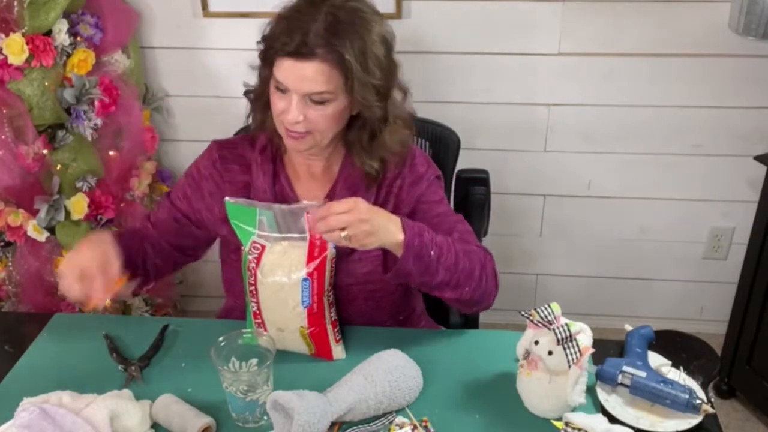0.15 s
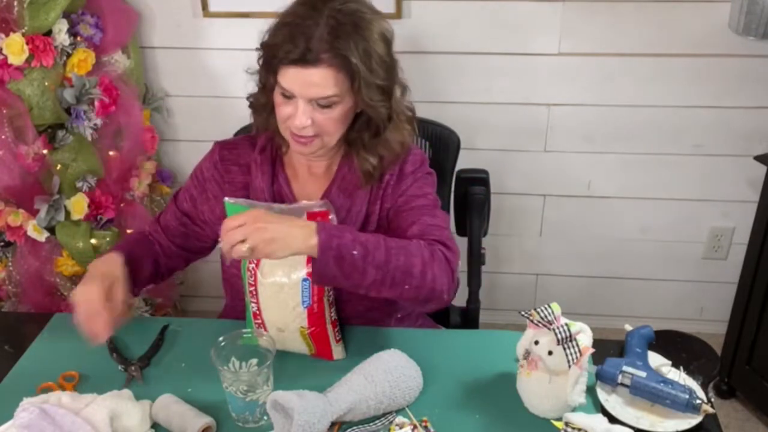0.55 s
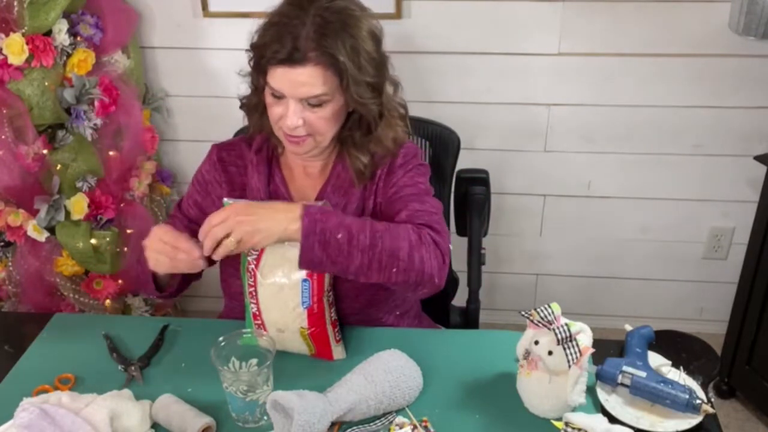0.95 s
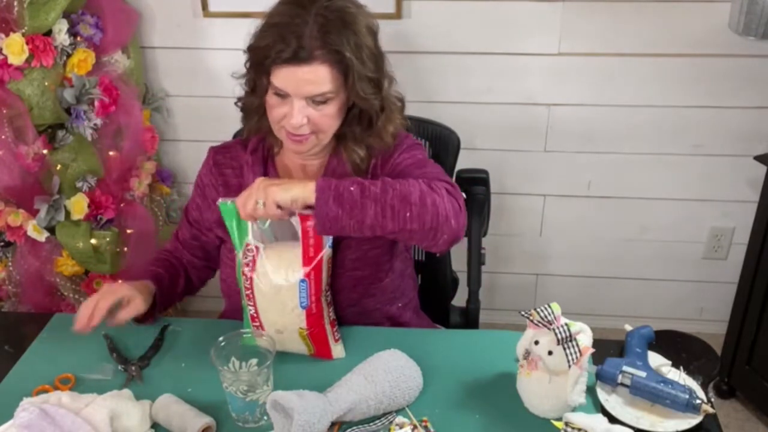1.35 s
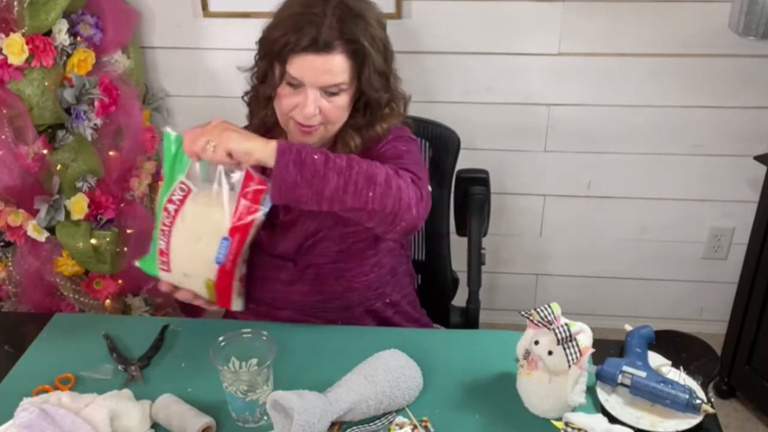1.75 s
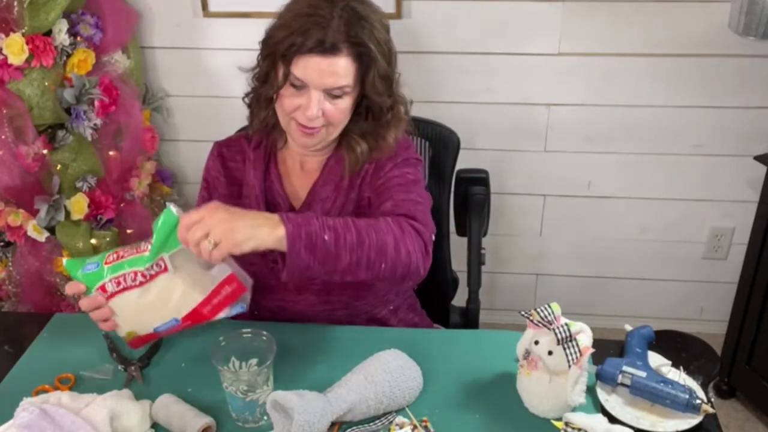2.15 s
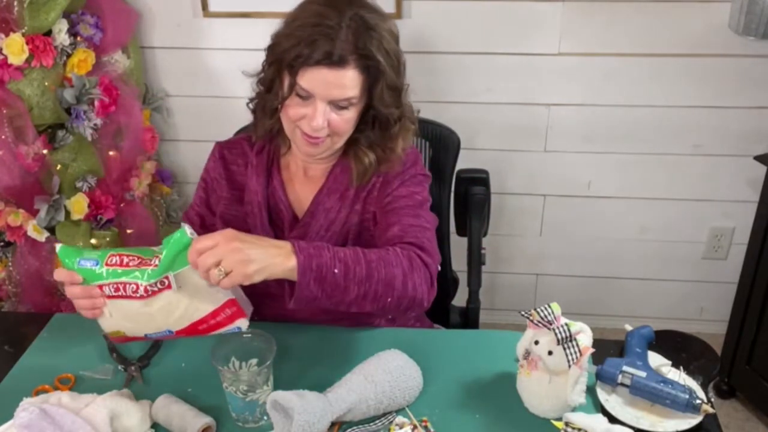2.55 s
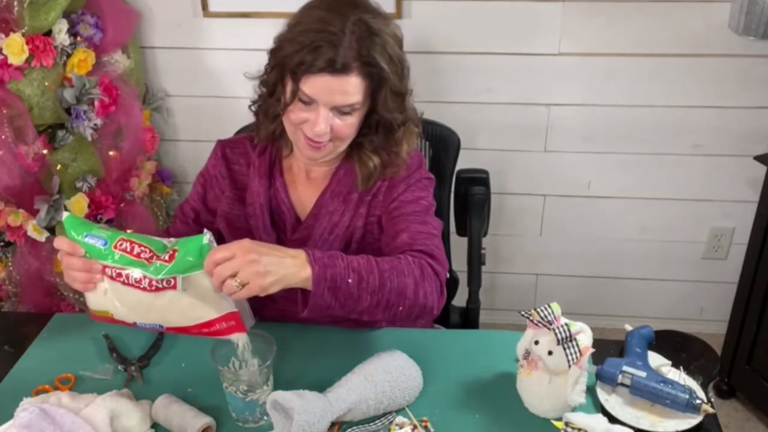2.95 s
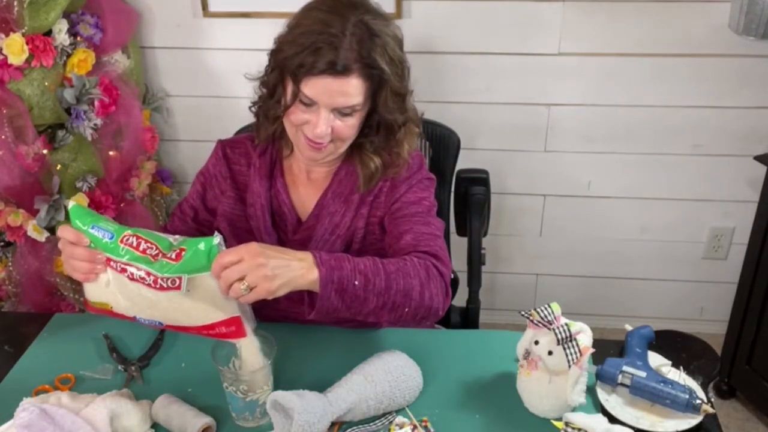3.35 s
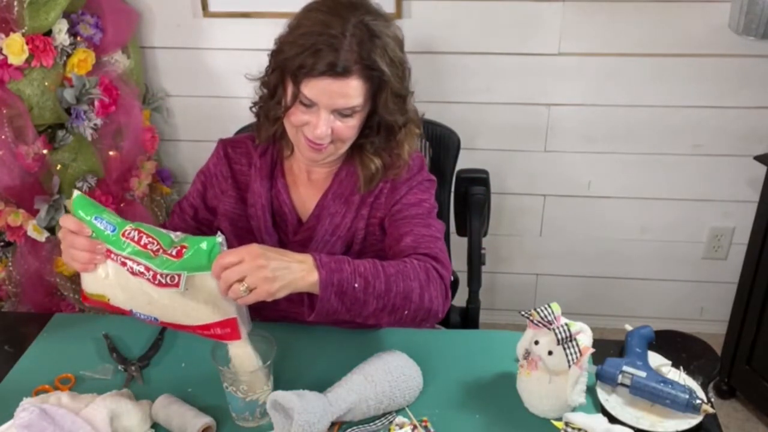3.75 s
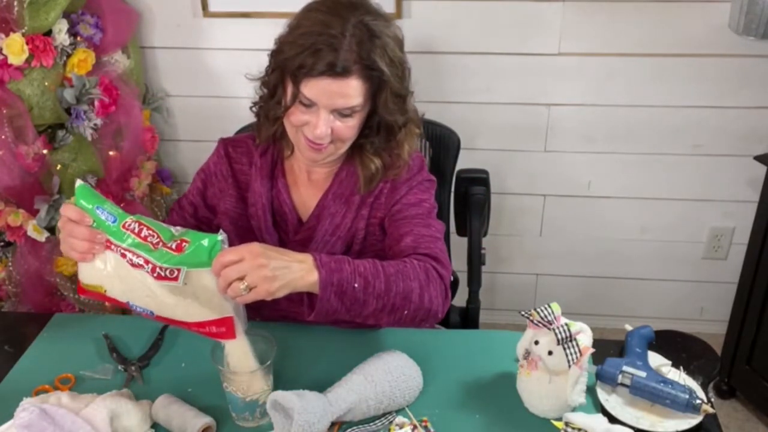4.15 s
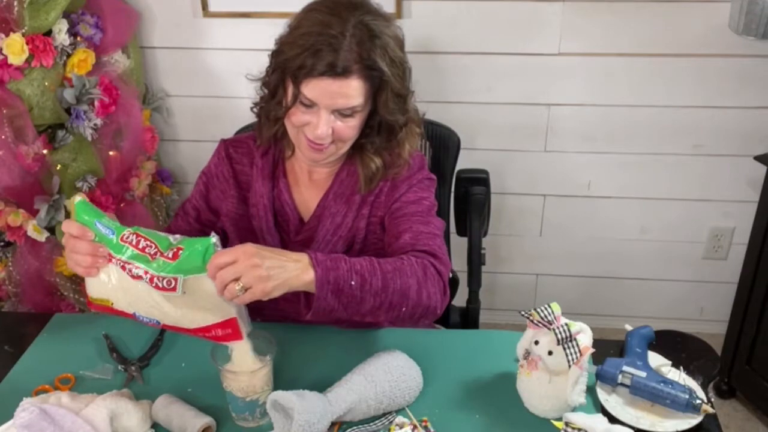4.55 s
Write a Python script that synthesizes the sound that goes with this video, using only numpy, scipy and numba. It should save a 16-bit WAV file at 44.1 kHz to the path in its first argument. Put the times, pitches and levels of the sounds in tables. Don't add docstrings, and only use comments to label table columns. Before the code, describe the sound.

Scissors clatter onto a worktable, a plastic rice bag crackles as it is lifted and tilted, then dry rice pours into a small thin cup.

```python
import sys
import numpy as np
from scipy import signal
from scipy.fft import rfft, irfft, next_fast_len
from scipy.io import wavfile
from scipy.ndimage import uniform_filter1d
from numba import njit

SR = 44100
rng = np.random.default_rng(int(sys.argv[2]) if len(sys.argv) > 2 else 0)


def materialize(psi):
    bounded = np.clip(np.atleast_2d(psi).T, -1, 1)
    quanta = np.round(bounded * 32767).astype(np.int16)
    wavfile.write(sys.argv[1], SR, quanta)


def attenuation_scalar(level_db):
    decades = np.asarray(level_db, float) / 20
    return 10 ** decades


N = 207137
TIME = np.arange(N) / SR


def on_log(table, hz, col=1):
    rows = np.array(table, float)
    return np.interp(np.log(np.maximum(hz, 1)), np.log(rows[:, 0]), rows[:, col])


def curves(table):
    s, *cols = np.transpose(table)
    inside = (TIME > s[0]) & (TIME < s[-1] + 0.01)
    gate = uniform_filter1d(1.0 * inside, size=600)
    return [np.interp(TIME, s, c) for c in cols] + [gate]


def unit(x):
    return x / np.sqrt(np.mean(x ** 2) + 1e-18)


def colour(x, table):
    size = next_fast_len(N)
    hz = np.arange(size // 2 + 1) * SR / size
    return irfft(rfft(x, size) * attenuation_scalar(on_log(table, hz)), size)[:N]


def crisp(x, hz, order=2):
    return signal.sosfilt(signal.butter(order, min(hz, 15000), "high", fs=SR, output="sos"), x)


def clicks(s, db):
    x = np.zeros(N)
    np.add.at(x, (np.asarray(s) * SR).astype(int), attenuation_scalar(db))
    return x


def rattle(x, length_s):
    burst = signal.lfilter([1], [1, -np.exp(-1 / (length_s * SR))], x)
    return burst * rng.standard_normal(N)


def modes(x, table, spread_db, damp=0.77):
    out = 0
    for hz, width, db in table:
        where = attenuation_scalar(spread_db * rng.standard_normal(N)) * rng.choice([-1, 1], N)
        pole = np.exp((2j * hz - damp * width) * np.pi / SR)
        out = out + attenuation_scalar(db) * signal.lfilter([1], [1, -pole], x * where).imag
    return out


@njit
def moving_mode(x, hz, width):
    y, z = np.empty(len(x)), 0j
    for i in range(len(x)):
        z = z * np.exp((2j * hz[i] - width) * np.pi / SR) + x[i]
        y[i] = z.imag
    return y


@njit
def wavelets(s, hz, cycles, size):
    y = np.zeros(N)
    for k in range(len(s)):
        tau = cycles[k] * SR / hz[k]
        pole = np.exp(2j * np.pi * hz[k] / SR - 1 / tau)
        z = size[k] * np.e / tau + 0j
        start = int(s[k] * SR)
        for j in range(min(N - start, int(8 * tau))):
            y[start + j] += j * z.imag
            z *= pole
    return y


def cloud(table, cycles, scatter_db, lift, count):
    u = rng.random((count, 3)).T
    s = u[0] * N / SR
    low, top = table[1][0], min(table[-1][0], 17000)
    hz = low * (top / low) ** u[1]
    db = on_log(table, hz) + 20 * np.log10(hz) - scatter_db * np.log(u[2] + 0.003)
    length = cycles + 0 * hz
    flat = np.sqrt(np.mean(wavelets(s, hz, length, attenuation_scalar(db)) ** 2))
    return wavelets(s, hz, length, attenuation_scalar(db + lift((u[0] * N).astype(int), hz))) / flat


# (frequency [Hz], density [dB per Hz])
ROOM_TONE = [(18, -57), (30, -34), (70, 9.5), (144, -1), (254, -7), (354, -7.5), (424, -10.5),
             (1420, -21.5), (6990, -32), (14000, -30)]


def room_tone():
    return attenuation_scalar(-70.5) * unit(colour(rng.standard_normal(N), ROOM_TONE))


# (frequency [Hz], decay time t60 [s], level [dB])
REFLECTIONS = [(99, 0.48, 2), (410, 0.28, 0), (1460, 0.3, -2.5), (3940, 0.25, -1.5), (8300, 0.24, -1.5),
               (14300, 0.15, 2.5)]


def room(x, gap_s=0.0011, count=6):
    t, tail = TIME[:SR // 2], 0
    for hz in 60 * 2 ** np.arange(0, 8.2, 0.5):
        sos = signal.butter(2, [hz * 0.84, hz * 1.19], "band", fs=SR, output="sos")
        fade = attenuation_scalar(on_log(REFLECTIONS, hz, col=2) - 60 * t / on_log(REFLECTIONS, hz))
        tail = tail + fade * signal.sosfilt(sos, rng.standard_normal((count, len(t))))
    tail = tail * np.clip(t / gap_s - 0.5, 0, 1)
    spot = np.repeat(rng.integers(count, size=N // 300 + 1), 300)[:N]
    at_spot = 1.0 * (spot == np.arange(count)[:, None])
    shares = np.sqrt(uniform_filter1d(at_spot, size=100).clip(0))
    return signal.fftconvolve(x * shares, tail, axes=1).sum(axis=0)[:N]


# (time [s], peak [dB], handle pitch [Hz], table thump [dB], tick [dB])
LANDINGS = [
    (0.318, -18.5, 1690, -22, -12.5),
    (0.4, -32, 1710, -12.5, -17),
    (0.456, -18, 1320, -14, -12),
]
# (frequency [Hz], width [Hz], level [dB])
TABLE_TOP = [(182, 61, 1), (281, 35, -1.5), (89, 35, -9), (463, 49, -3)]
# (frequency [Hz], level [dB], decay time t60 [s])
STEEL = [(1477, -8, 0.35), (1740, -1.5, 0.26), (1760, -7, 0.32), (2234, -17, 0.16)]


def scissors():
    s, db, hz, low, top = np.transpose(LANDINGS)
    clack = wavelets(s, hz, 0.42 + 0 * s, attenuation_scalar(db - 3))
    clack = clack + wavelets(s + 0.0022, 1.79 * hz, 0.36 + 0 * s, attenuation_scalar(db - 5))
    blades = [(f, np.log(1000) / np.pi / t60, level) for f, level, t60 in STEEL]
    steel = modes(clicks(s, db - 31), blades, 2.7)
    thump = modes(clicks(s + 0.0019, db + low), TABLE_TOP, 0)
    tick = crisp(rattle(clicks(s, db + top), 0.00084), 2300)
    return clack + steel + attenuation_scalar(-4) * thump + attenuation_scalar(-7.5) * tick


# (time [s], peak [dB],
# centre [Hz], crisp top [dB])
FILM_SNAPS = [(.216, -55, 11500, -23), (0.672, -59, 3270, -17), (0.69, -43.5, 4200, -6.5),
              (0.719, -44.5, 2410, -12), (0.821, -54.5, 1374, -7), (0.835, -41.5, 5700, -12),
              (0.948, -59, 4080, 2), (0.986, -63, 1335, -15), (1.024, -52, 1340, -5), (1.086, -58, 708, -16),
              (1.142, -37, 1140, -17), (1.181, -32.5, 1200, -15), (1.198, -29.5, 3980, -17),
           (1.225, -28.5, 1100, -0.5), (1.244, -26, 1490, -16), (1.262, -33, 690, -10),
           (1.291, -30, 704, -7), (1.31, -25.5, 2860, -3.5), (1.315, -26, 1270, -22),
           (1.393, -31, 1140, -11), (1.431, -39, 670, -4), (1.584, -36, 1140, -2.5),
           (1.648, -37, 3000, -12), (1.659, -30.5, 930, -24), (1.729, -40, 2750, 1), (1.793, -36, 780, -18),
           (1.818, -34, 1440, -39), (1.85, -34.5, 825, -35), (1.895, -34.5, 3400, -14),
           (1.952, -46, 1000, -8), (1.996, -30, 3000, -10.5), (2.026, -23, 1310, -22),
           (2.067, -71, 807, -20), (2.106, -33, 1350, -24), (2.471, -42.5, 3300, -19),
           (2.527, -44.5, 1110, -32), (2.61, -42.5, 890, -15), (2.628, -35, 1540, -8.5)]
# (time [s], peak [dB], centre [Hz])
WEIGHT_SHIFTS = [(1.67, -55, 112), (1.322, -38, 230), (3.369, -49.5, 360), (3.837, -45.5, 322),
                 (3.947, -44.5, 590)]


def bag_snaps():
    s, db, hz, top = np.transpose(FILM_SNAPS)
    snaps = wavelets(s, hz, 0.38 + 0 * s, attenuation_scalar(db - 0.5))
    snaps = snaps + attenuation_scalar(2) * crisp(rattle(clicks(s, db + top), 0.00047), 1600)
    s, db, hz = np.transpose(WEIGHT_SHIFTS)
    thuds = wavelets(s, hz, 1.05 + 0 * s, attenuation_scalar(db)) + wavelets(s, 3.37 * hz, 0.47 + 0 * s, attenuation_scalar(db + 6))
    return snaps + thuds


# (start [s], rise [s], fade by 20 dB [s], rustle [dB], treble [dB])
HAND_MOVES = [(0.684, 0.0082, 0.06, -76.5, 25.5), (0.799, 0.031, 0.2, -90.5, 29.5),
              (1.02, 0.023, 0.5, -73, 8.5), (1.108, 0.038, 0.11, -55.5, 3.5), (1.19, 0.07, 0.06, -46, 2.5),
              (1.3, 0.016, 0.03, -46.5, 10.5), (1.331, 0.069, 0.12, -46, 0), (1.568, 0.018, 0.35, -56, 3.5),
              (1.639, 0.0083, 0.13, -53.5, 4), (1.779, 0.0082, 0.65, -53, -1.5),
              (1.9, 0.31, 0.29, -43.5, -5), (2.118, .17, 0.5, -64.5, 8.5), (2.4, 0.18, 1.9, -59, -18),
              (2.621, 0.0075, 0.08, -53, 3)]


def hand_level(s, hz):
    start, rise, fade, db, treble = np.transpose(HAND_MOVES)[:, :, None]
    up = np.clip(np.log2(hz / 2000) / 1.36, 0, 1)
    down = np.clip(np.log2(700 / hz) / 1.17, 0, 1)
    fall = 20 * (np.maximum(s - start - rise, 0) / fade) ** 1.27 * (1 + 0.96 * up)
    bottom = 7.5 - 40 * rise
    level = db - fall + (treble + 5.5) * up + bottom * down
    gain = np.clip((s - start) / rise, 0, 1) * attenuation_scalar(level)
    return 10 * np.log10(np.sum(gain ** 2, axis=0) + 1e-18)


# (frequency [Hz], density [dB per Hz])
FILM_COLOUR = [(71, -48), (120, -19), (209, 0), (557, -3.5), (1340, 0.5), (1460, -6.5), (2480, -6.5),
               (14400, -30), (16000, -57)]


def bag_rustle():
    hold = int(0.012 * SR)
    clump_db = 2 * rng.standard_normal(N // hold + 1)
    rustle = cloud(FILM_COLOUR, 0.75, 3, lambda i, hz: hand_level(i / SR, hz) + clump_db[i // hold], 30000)
    slump = np.clip((TIME - 2.52) / 0.57, 0, 1)
    slide_colour = [(50, -9), (110, 1), (350, -2), (900, -3), (3000, -20.5)]  # (Hz, dB)
    slide = unit(colour(rng.standard_normal(N), slide_colour))
    return attenuation_scalar(-2) * rustle + attenuation_scalar(-60.5) * slump * slide


# (frequency [Hz], width [Hz], level [dB])
CUP_WALL = [(690.5, 10.2, -7), (717.6, 11.0, -5), (968, 44, -10), (1140, 160, -7), (1710, 84, -1.5),
            (1935, 25, -13), (2500, 39, -7.5), (3000, 124, 1), (3494, 48, -6.5), (4300, 260, -9),
            (5070, 69, -8), (5680, 106, -6.5), (7260, 260, -29)]
# (time [s], peak [dB], tick [dB], low ring [dB])
LONE_GRAINS = [(2.7116, -56, -13, -3.5), (2.7215, -25, -2, -17), (2.7363, -21, -8, -18.5),
               (2.7666, -24, -17, -15), (2.7836, -20, -12, -19.5), (2.829, -22, -7.5, -18),
               (2.8584, -35, -13, -13), (2.8654, -33, -8, -29), (2.8706, -27.5, -2, -12),
               (2.9021, -22, -23, -20), (2.9209, -24, -5.5, -22), (2.9323, -22, -7.5, -9),
               (2.7395, -20, -7, -19), (2.7695, -19, -12, -28), (2.846, -35, -5, -33)]


def lone_grains():
    s, db, top, low = np.transpose(LONE_GRAINS)
    high_ring = modes(rattle(clicks(s, db), 0.00079), CUP_WALL[6:], 1.94, damp=3.84)
    low_ring = modes(clicks(s, db + low), CUP_WALL[:6], 3.5)
    tick = crisp(rattle(clicks(s, db + top), 0.00095), 5700)
    chatter = crisp(rattle(clicks(s, db - 7.5), 0.0014), 2200)
    return attenuation_scalar(-17.5) * high_ring + attenuation_scalar(-4.5) * low_ring + attenuation_scalar(1.5) * tick + attenuation_scalar(-5) * chatter


# (frequency [Hz], density [dB per Hz])
PATTER_COLOUR = [(470, -38), (800, -1.5), (1070, -12), (1490, -7), (2070, -8.5), (3140, -7.5), (3820, -0.5),
                 (7110, 0.5), (9500, -6.5), (12400, -13), (20900, -120)]
# (time [s], patter level [dB])
POUR = [(2.92, -50), (2.955, -30.5), (3.02, -28.5), (3.165, -29), (3.205, -33), (3.45, -35.5), (3.7, -39.5),
        (4.55, -42.5), (4.697, -51.5)]


def stream():
    level, gate = curves(POUR)
    hold = int(SR / 55)
    flutter = np.repeat(rng.standard_normal(N // hold + 1), hold)
    level = level + 2 * unit(uniform_filter1d(flutter, hold)[:N])

    buried_s = 3.28
    buried = (1 + np.tanh((TIME - buried_s) / 0.058)) / 2
    since = np.maximum(TIME - buried_s, 0)
    base_db = -8.5 - 4 * buried - 12.5 * since
    wall_db = -2.5 - 17 * buried - 4 * since
    tick_db = -2 - 6 * buried

    u = rng.random((9000, 2)).T
    hits = clicks(u[0] * (N - 1) / SR, -3 * np.log(u[1] + 0.003))
    base = attenuation_scalar(base_db) * unit(modes(hits, CUP_WALL[:2], 3.5))
    wall = attenuation_scalar(wall_db + 1.5) * unit(modes(hits, CUP_WALL[2:], 6.4, damp=1.0))
    ticks = attenuation_scalar(tick_db) * unit(crisp(rattle(hits, 0.0003), 10100, order=4))
    patter = cloud(PATTER_COLOUR, 1.13, 1.6, lambda i, hz: 0 * hz, 30000)
    u = rng.random((500, 3)).T
    stray_db = 6.5 - 2 * np.log(u[1] + 0.054)
    stray = wavelets(u[0] * N / SR, 4200 * 2 ** u[2], 0.85 + 0 * u[2], attenuation_scalar(stray_db))
    column_hz = 3790 + 680 * (TIME - POUR[0][0])
    column = unit(moving_mode(patter, column_hz, 2200.0))
    return gate * attenuation_scalar(level - 4.5) * (patter + attenuation_scalar(-13) * column + base + wall + ticks + stray)


def rice():
    return crisp(lone_grains() + stream(), 625, order=6)


def scene():
    tool, snaps, rustle, grain = scissors(), bag_snaps(), bag_rustle(), rice()
    wet = room(attenuation_scalar(-26) * tool + attenuation_scalar(-28) * snaps + attenuation_scalar(-31) * rustle + attenuation_scalar(-30) * grain)
    return (tool + snaps + rustle + grain + wet + room_tone())[None]


def roll_off(x):
    return signal.sosfilt(signal.butter(12, 16820, fs=SR, output="sos"), x)


# (frequency [Hz], response [dB])
MICROPHONE = [(40, -20), (90, -7.5), (7900, 4.5), (8300, -0.5), (15000, 1), (15700, -23), (16000, -37)]


def record(dry):
    mix = colour(dry[0], MICROPHONE)[None]
    return roll_off(mix)


dry = scene()
out = record(dry)
materialize(out)
```